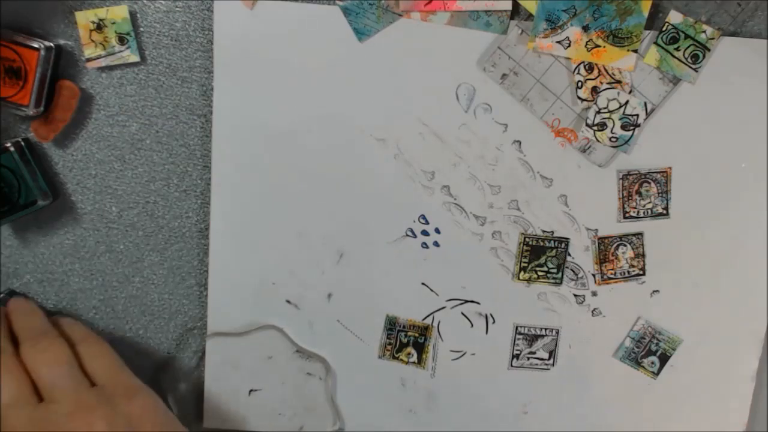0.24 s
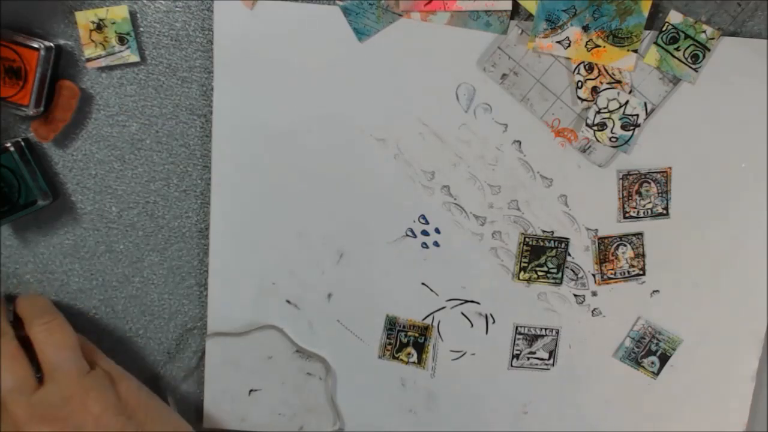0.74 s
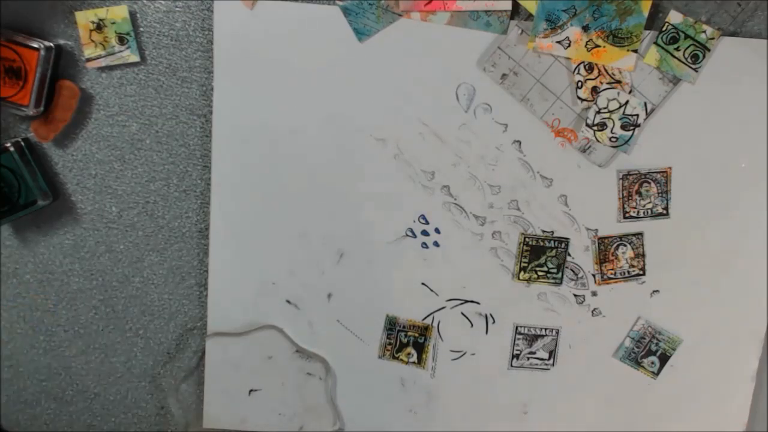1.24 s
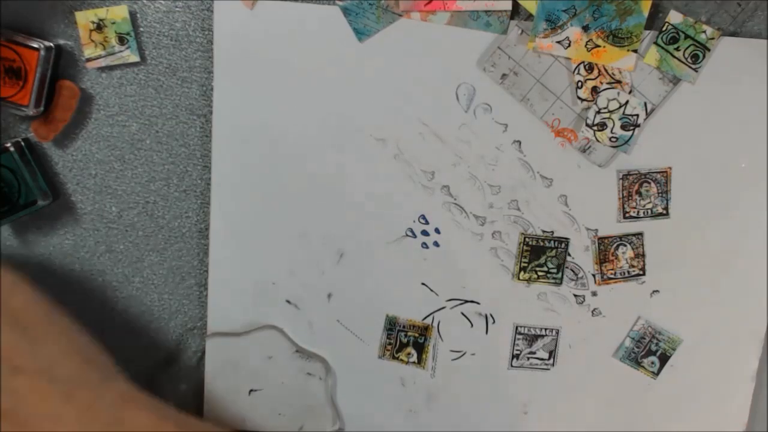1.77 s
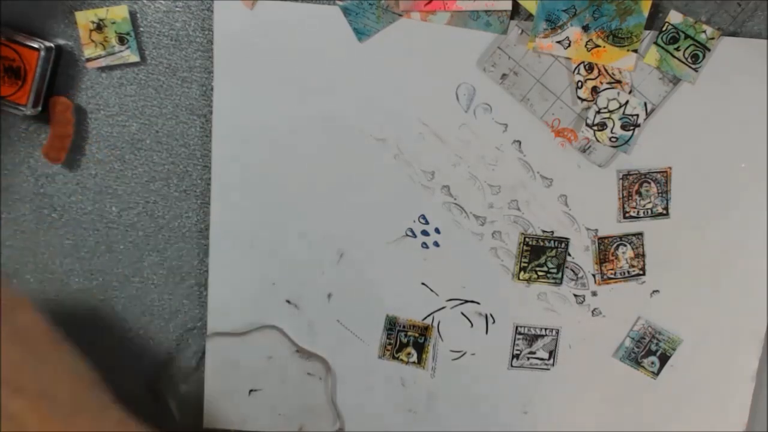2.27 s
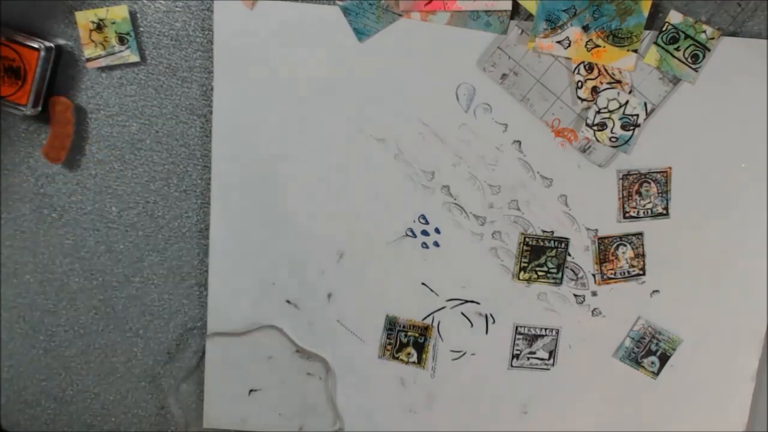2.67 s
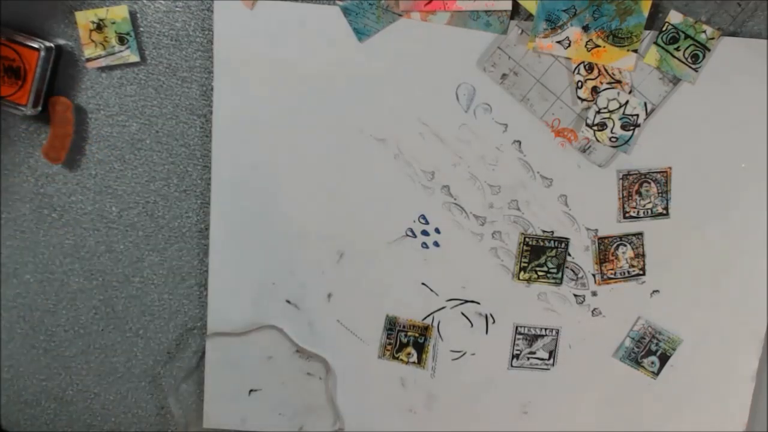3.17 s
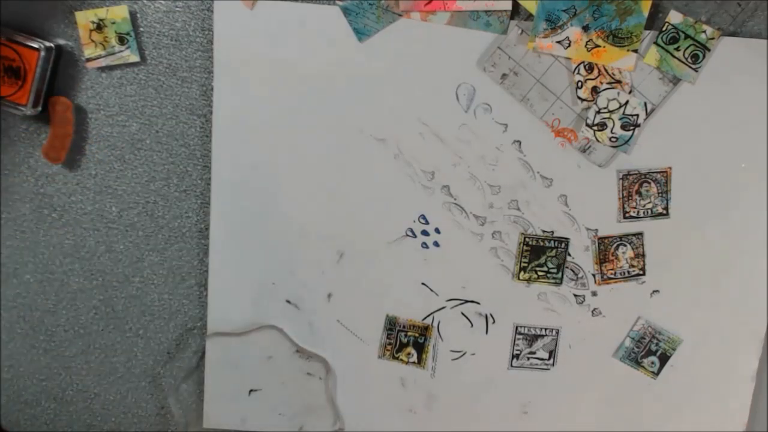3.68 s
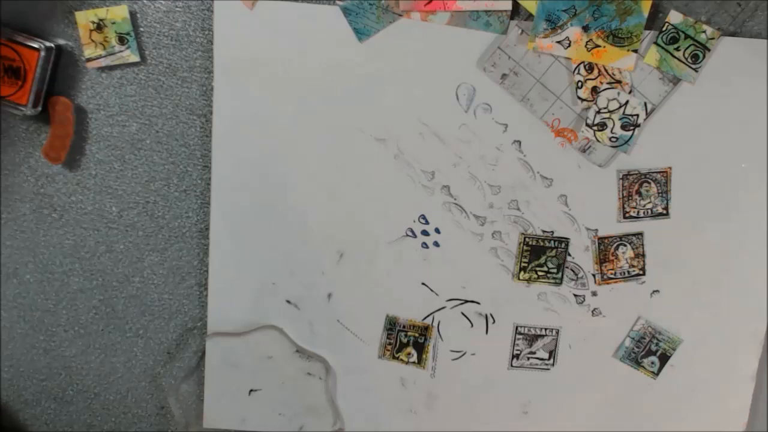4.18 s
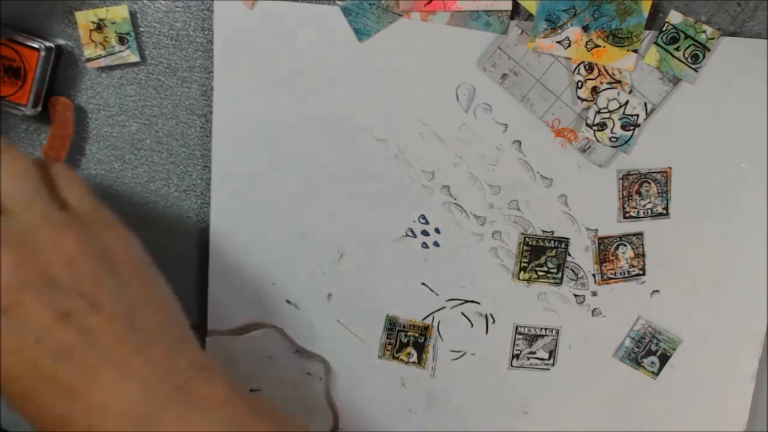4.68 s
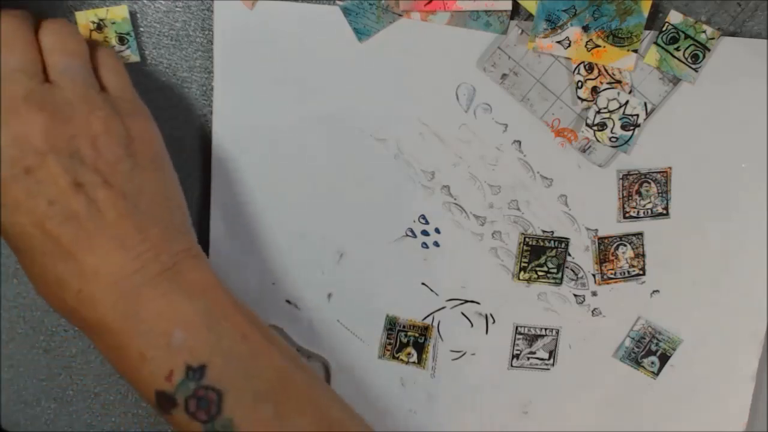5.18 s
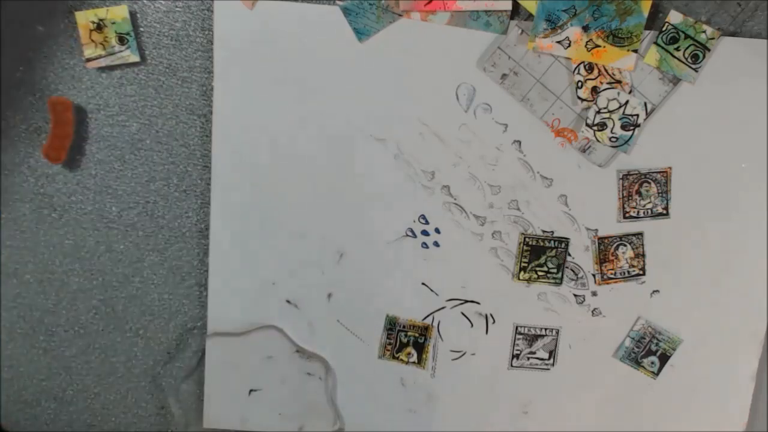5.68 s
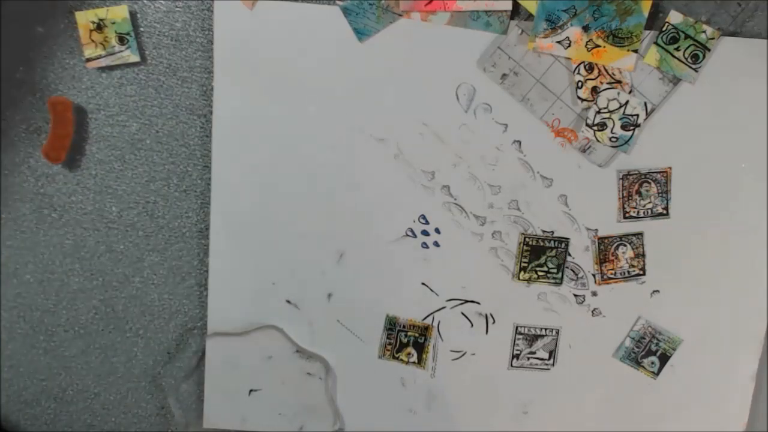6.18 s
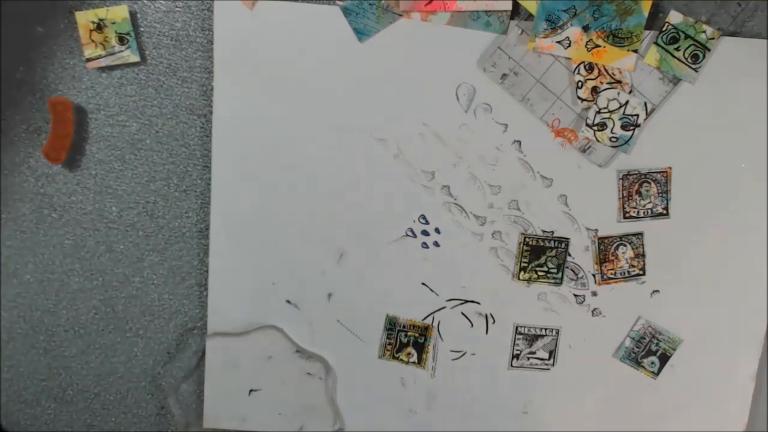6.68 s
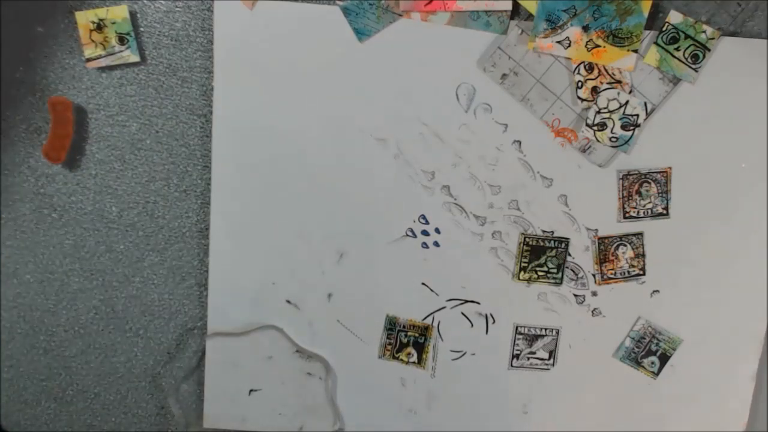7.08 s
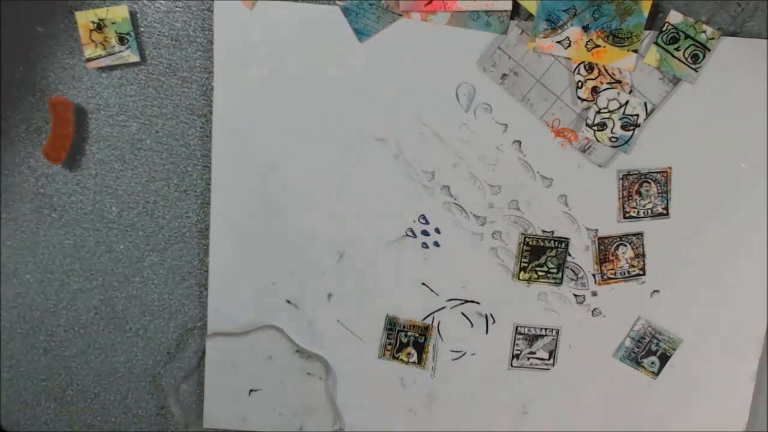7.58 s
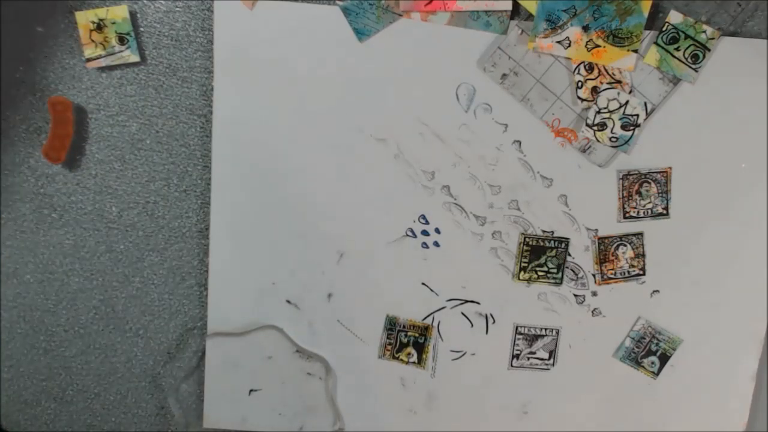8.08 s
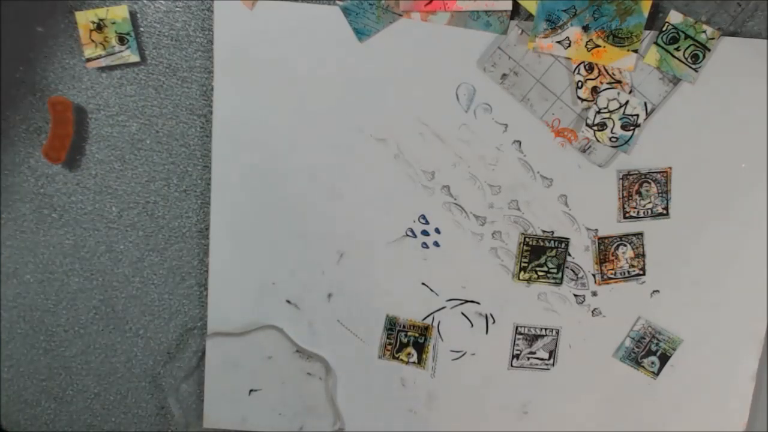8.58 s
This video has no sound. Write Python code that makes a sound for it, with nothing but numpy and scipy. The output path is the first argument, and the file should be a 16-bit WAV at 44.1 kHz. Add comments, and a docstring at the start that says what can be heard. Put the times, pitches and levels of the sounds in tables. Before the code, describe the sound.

Irregular plastic clatter and dull table knocks, with crisp scuffing ticks and a low rumble, in a quiet small room.

```python
"""Small plastic ink pads are gathered from a craft table and stacked away, close to the microphone.
Each contact is a short burst of force that rings modes of the table and the hollow cases, shared out by
weight, hardness and the spot struck; scuffs of plastic on plastic are scattered tiny ticks over a rub.
The table rumbles softly in low swaying resonances as it is leaned on, and fingers brush it faintly.
Behind lie background noise, coloured and patchy in level, and the hum of a fan, as narrow bands of noise."""
import sys
import numpy as np
from scipy import signal
from scipy.fft import rfft, irfft
from scipy.io import wavfile
from scipy.ndimage import uniform_filter1d

SR = 44100
rng = np.random.default_rng(int(sys.argv[2]) if len(sys.argv) > 2 else 0)


def dump(signal):
    """Clip the signal to [-1, 1] and save it as 16-bit WAV at the path in sys.argv[1]."""
    limited = np.clip(np.atleast_2d(signal).T, -1, 1)
    pcm = np.round(limited * 32767).astype(np.int16)
    wavfile.write(sys.argv[1], SR, pcm)


N = 389844

# The five parts that ring: thud, knock, case, lid, tick. Each row: lowest in Hz, highest in Hz,
# dull crack against the ring in dB, room against the direct sound in dB, room t60 in s, pitch spread as a share.
PARTS = [(28.2, 210, -12.5, 0.5, .35, 0.0057), (205, 620, 2, -2.5, 0.25, 0.0038),
         (655, 1706, 10, 1, 0.23, 0.014), (1598, 5100, 8, 2, 0.24, 0.04), (4630, 18000, 4, -6, 0.2, 0.034)]
# The table's lowest resonances, which leaning sets swaying. Each row: pitch in Hz, level in dB.
SWAY_MODES = [(80, -1), (156, -10.5)]


def amp(db):
    """Decibels to gain."""
    return 10 ** (np.asarray(db) / 20)


def unit_rms(x):
    """Scales to a mean power of 1."""
    return x / np.sqrt(np.mean(x ** 2) + 1e-20)


def unit_energy(x):
    """Scales to a total energy of 1."""
    return x / (np.linalg.norm(x) + 1e-20)


def add(mix, s, sound):
    """Mixes a sound in at time s."""
    part = mix[max(round(s * SR), 0):][:len(sound)]
    part += sound[:len(part)]


def coloured(x, points):
    """Filters x by a curve of (Hz, dB) points, at rms 1."""
    hz, db = np.transpose(points)
    f = np.fft.rfftfreq(len(x), 1 / SR)
    gain = amp(np.interp(np.log(f + 1), np.log(hz), db))
    return unit_rms(irfft(rfft(x) * gain, len(x)))


def band(x, lo_hz, hi_hz, order=4):
    """Causal band-pass."""
    edges = [lo_hz, min(hi_hz, SR / 2 - 1000)]
    return signal.sosfilt(signal.butter(order, edges, "band", fs=SR, output="sos"), x)


def drift(per_s):
    """Random wandering of rms 1, with per_s turning points each second."""
    knots = rng.standard_normal(400)
    return unit_rms(np.interp(np.arange(N) / SR * per_s, np.arange(400), knots))


def emphasise(x, hz, width_hz, broad):
    """One wide resonance on top of a share of the plain sound."""
    b, a = signal.iirpeak(min(hz, SR / 3), hz / width_hz, fs=SR)
    return signal.lfilter(b, a, x) + broad * x


def ring(t, lo_hz, hi_hz, crack_db, spread, spot_db=0.5):
    """Decaying modes of one part, their strengths and pitches varied at each call, plus a dull crack."""
    # Modes of the table (under 700 Hz) and of the plastic cases.
    # Each row: pitch in Hz, level in dB before the weighting by decay, t60 in s.
    modes_of_parts = [(38.43, -13, 0.25), (107.6, 0.5, 0.11), (168, 2.5, 0.096), (215.2, -1, 0.037),
                      (298.4, -6, 0.1), (328.3, -1.5, 0.12), (477, -6, 0.092), (533, 1, 0.08),
                      (875, -9.5, 0.022), (931, -2.5, 0.075), (1088, -5, 0.1), (1260, -13, 0.024),
                      (1561, -6.5, 0.072), (2024, 3, 0.022), (2278, 0.5, 0.044), (2590, -4.5, .04),
                      (3100, -1, 0.025), (3610, 3, 0.02), (4700, 6, 0.02), (5410, 2.5, .015),
                      (5784, 2, 0.02), (7430, -8.5, 0.029), (7400, 0.5, 0.014), (8440, 4, 0.0031),
                      (9700, -0.5, 0.0042)]
    hz, db, t60 = np.transpose(modes_of_parts)
    strength, offset, side = rng.standard_normal((3, len(hz)))
    # short modes start louder
    size = np.sign(side) * amp(db + spot_db * strength) / np.sqrt(t60)
    pitch = hz * (1 + spread * offset)
    modes = np.zeros(len(t))
    for k in np.flatnonzero((hz >= lo_hz) & (hz < hi_hz)):
        decay = np.exp(-np.log(1000) * t / t60[k])
        modes += size[k] * decay * np.sin(2 * np.pi * pitch[k] * t)
    crack = band(signal.unit_impulse(len(t)), lo_hz, hi_hz)
    return unit_energy(band(modes, lo_hz, hi_hz, order=2)) + amp(crack_db) * unit_energy(crack)


def room(t, room_db, t60, first_s=.003, near_s=0.0045, near_db=-3):
    """Direct sound, quick echoes off the table and its clutter, then the tail of a small room."""
    sparse = rng.standard_normal((2, len(t))) * (rng.random((2, len(t))) < 1 / 8)
    taps = sparse * (t > first_s)
    tail = unit_energy(taps[0] * np.exp(-np.log(1000) * t / t60))
    near = unit_energy(taps[1] * np.exp(-t / near_s))
    response = amp(room_db) * (tail + amp(near_db) * near)
    response[0] += 1
    return response


def background(noise_db=-57.5, swell_db=0.2, level_patch_db=3.0, flutter_db=4.5):
    """Background noise with random level patches across time and pitch, and the fuzzy, fluttering hum of a fan."""
    # The tone of the room air. Each row: frequency in Hz, level in dB per Hz before noise_db sets the loudness.
    air_colour = [(15, -9), (32, -0.5), (85, -6), (155, 4.5), (220, -15.5), (480, -7.5), (570, -2.5),
                  (690, -9.5), (1000, -13), (1500, -17.5), (3300, -27.5), (9000, -28), (15500, -38.5)]
    # The fan's resonances. Each row: centre in Hz, rms level in dB before the flutter, width in Hz.
    hum = [(558.5, -69.5, 54), (946, -75, 9.7), (1108, -74.5, 14)]
    cells = signal.stft(coloured(rng.standard_normal(N), air_colour), nperseg=1024)[2]
    level_patches = uniform_filter1d(rng.standard_normal(cells.shape), size=14, axis=0)
    level_patches = unit_rms(uniform_filter1d(level_patches, size=12, axis=1))
    noise = signal.istft(cells * amp(level_patch_db * level_patches), nperseg=1024)[1][:N]
    out = amp(noise_db + swell_db * drift(7.5)) * noise
    for hz, db, width_hz in hum:
        line = band(rng.standard_normal(N), hz - width_hz / 2, hz + width_hz / 2, order=2)
        out += amp(db + flutter_db * drift(7.9)) * unit_rms(line)
    return out


def tremble(level_db=-59, uneven_db=5.5, turns_per_s=6.5, width_hz=16):
    """Small random shifts of weight keep the table's lowest resonances stirring under the arm."""
    push = rng.standard_normal(N) * amp(uneven_db * drift(turns_per_s))
    motion = sum(amp(db) * emphasise(push, hz, width_hz, 0) for hz, db in SWAY_MODES)
    return amp(level_db) * unit_rms(band(motion, 45, 320, order=2))


def sway(length_s=0.3, spread=0.032, looseness=0.36):
    """Each heavier shift of weight makes the table's lowest resonances swell and fade over a low rumble."""
    # The heavier shifts of weight on the table. Each row: peak in seconds, level in dB before the fades.
    nudges = [(0.298, -51.5), (0.518, -48), (1.91, -47.5), (2.458, -47), (2.989, -44), (3.53, -42),
              (3.818, -47), (4.072, -42.5), (4.238, -47), (4.841, -46), (5.641, -45.5), (5.832, -45),
              (6.7, -42.5), (6.898, -45.5), (7.252, -51), (7.599, -52.5), (7.799, -51), (8.068, -45),
              (8.383, -45), (8.522, -44)]
    t, out = np.arange(round(length_s * SR)) / SR, np.zeros(N)
    for s, level_db in nudges:
        rumble = unit_rms(band(rng.standard_normal(16384), 45, 147, order=2))
        motion = looseness * rumble[:len(t)]
        for hz, db in SWAY_MODES:
            pitch = hz * (1 + spread * rng.standard_normal())
            motion = motion + amp(db) * np.sin(2 * np.pi * (pitch * t + rng.random()))
        add(out, s - length_s / 2, amp(level_db) * unit_rms(motion) * np.hanning(len(t)))
    return out


def brushing(level_db=-71, uneven_db=5, turns_per_s=14, lo_hz=260, hi_hz=2800):
    """Fingers brush the table and the cases: faint uneven noise rings their modes."""
    rub = rng.standard_normal(N) * amp(uneven_db * drift(turns_per_s))
    body = ring(np.arange(8192) / SR, lo_hz, hi_hz, crack_db=2, spread=0.0047)
    return amp(level_db) * unit_rms(signal.oaconvolve(rub, body)[:N])


def slides(catches_per_s=320, size_db=5, uneven_db=1.5, hiss=0.96, scrape_db=-20,
           catch_s=0.00074, room_db=-3, catch_hz=7800, spread=0.17):
    """Sliding plastic catches and lets go: scattered tiny ticks, each at its own pitch, over a fine rub."""
    # Plastic scuffing on plastic, each a swell and a release.
    # Each row: peak in seconds, length in seconds, pressure in dB.
    scuff_swells = [(0.026, 0.16, -52), (0.164, 0.11, -54.5), (0.281, 0.14, -50), (0.374, 0.024, -40),
                    (0.408, 0.045, -46), (0.496, .04, -34), (0.554, 0.064, -42), (0.632, 0.066, -48),
                    (0.718, 0.087, -46), (2.83, 0.19, -64.5), (3.01, .18, -68), (4.975, 0.13, -69),
                    (5.745, 0.021, -49), (5.91, 0.051, -36.5), (6.873, 0.16, -59.5), (6.968, 0.052, -60),
                    (8.021, 0.043, -66), (8.292, 0.093, -44.5), (8.413, 0.057, -40), (8.46, .04, -47),
                    (8.579, 0.068, -45.5), (8.788, 0.06, -56)]
    # The tone of the rub. Each row: frequency in Hz, level in dB per Hz before the pressure sets the loudness.
    slide_colour = [(500, -1), (1500, -13.5), (4000, -11), (6500, -5), (8200, -3.5), (10000, -3),
                    (16000, -11.5)]
    ticks, t, now = np.zeros(N), np.arange(8192) / SR, np.arange(N) / SR
    pressure = np.zeros(N)
    for s, length_s, level_db in scuff_swells:
        pressure += amp(level_db) * np.exp(-2 * (2 * (now - s) / length_s) ** 2)

    chance, size, pitch = rng.random(N), rng.exponential(1, N), rng.standard_normal(N)
    age = t[:160] / catch_s
    for at in np.flatnonzero(chance < catches_per_s / SR):
        hz = catch_hz * np.exp(spread * pitch[at])
        tick = age * np.exp(-age) * np.sin(2 * np.pi * hz * t[:160])
        add(ticks, at / SR, amp(size_db * min(size[at], 3)) * tick)

    rub = (unit_rms(ticks) + hiss * rng.standard_normal(N)) * amp(uneven_db * drift(40))
    lid_ring = ring(t, 2000, 3500, crack_db=-6.0, spread=0.022)
    lid = unit_rms(signal.oaconvolve(rub, lid_ring)[:N])  # the rub also rings the lid
    scuffs = pressure * (coloured(rub, slide_colour) + amp(scrape_db) * lid)
    tick_t60 = PARTS[-1][4]
    return signal.oaconvolve(scuffs, unit_energy(room(t, room_db, tick_t60)))[:N]


def force(chatter_s, first_touch=2.0, soft_s=0.002, glancing_s=0.0054, evenness=0.38):
    """A first touch, then a chatter of tiny slips; a long, glancing chatter swells with little first touch."""
    t = np.arange(4096) / SR
    age = 2 * t / max(chatter_s, 1 / SR)
    swell = age ** min(1 + chatter_s / glancing_s, 2) * np.exp(-age)
    slips = unit_energy(rng.standard_normal(len(t)) * rng.exponential(1, len(t)) * swell)
    slips[0] += first_touch * np.exp(-chatter_s / soft_s)
    spectrum = rfft(np.roll(slips, 16))  # a few samples of lead-in for what the flattening spreads ahead
    # the force has little pitch of its own: most colour comes from what it strikes
    flattened = spectrum / (abs(spectrum) + 1e-6) ** min(evenness, 1)
    return irfft(flattened)[:len(t) // 2]


def soften(x, hardness_db, corner_hz=3400, follow=0.52):
    """A soft touch, with little tick, reaches only the lower modes of the lid."""
    hz = np.clip(corner_hz * amp(follow * hardness_db), 1500, SR / 4)
    return signal.sosfilt(signal.butter(4, hz, fs=SR, output="sos"), x)


def contacts():
    """One force drives table and case at each contact; weight, hardness and spot share it out."""
    # A case meets the table or another case. Weight goes into the table and hardness into the sharp edge tick.
    # Each row: start in seconds, strength in dB, weight in dB against the strength, hardness in dB against
    # the strength, spot struck (0 = hollow base, 1 = lid), chatter time in seconds, pitch of the hollow ring
    # in Hz, pitch of the edge tick in Hz.
    touches = [(0.199, -71.5, -15, 32, 0.44, 0.0003, 940, 8250),
               (0.22, -71, -1, 30, 0.62, 0.0018, 1030, 9450),
               (0.3822, -62.5, -5, 26.5, 0.5, 0.0032, 1350, 8900),
               (0.4405, -68.5, -0.5, 28, 0.47, 0.00067, 930, 7400),
               (0.463, -59, -2, 20.5, 0.44, 0.00054, 990, 8450),
               (0.501, -50.5, 6, 17, 0.59, 0.0018, 970, 8200),
               (0.5223, -47, -10, 21, 0.58, 0.0017, 1130, 8200),
               (0.585, -59, -11, 13.5, 0.64, 0.0019, 1490, 8500),
               (0.7524, -59.5, -25, 22.5, 0.37, 0.0013, 940, 7150),
               (0.819, -45.5, -21, -6.5, 0.61, 0.003, 1260, 5500),
               (0.834, -40, -24, -2.5, 0.72, 0.0021, 1260, 5500),
               (0.909, -33.5, -2, -11.5, 0.6, 0.0025, 850, 6950),
               (0.9446, -37, -0.5, -10.5, 0.24, 0.0043, 1100, 6950),
               (0.95, -37, -23, -6.5, 0.31, 0.0014, 1100, 6950),
               (0.9926, -48, -1.5, 7, 0.092, 0.0035, 1110, 9250),
               (1.536, -42.5, 3.5, -4, 0.47, 0.0021, 960, 8700),
               (1.5551, -41.5, 0.5, 14.5, 0.7, 0.0023, 930, 7200),
               (1.5685, -47.5, 7, 15.5, 0.61, 0.0013, 920, 7300),
               (1.595, -38, -5, 13.5, 0.43, 0.0011, 1140, 7350),
               (1.701, -47, 7.5, -19, 0.05, 0.0013, 920, 8300),
               (1.7985, -50.5, 8.5, -21, 0.63, 0.0015, 750, 8300),
               (1.823, -62.5, 13, -22, 0.23, 0.0035, 720, 8300),
               (2.144, -60, -8, 8, 0.65, 0.0015, 920, 7550),
               (2.182, -48, -11, -16, 0.5, 0.0024, 1230, 7300),
               (2.201, -37, -29, -10, 0.68, 0.0031, 1210, 7300),
               (2.979, -62.5, 14.5, -12, 0.5, 0.013, 720, 8300),
               (3.078, -33, 1, -16.5, 0.11, 0.0016, 930, 8300),
               (3.357, -54, -20, -22, 0.88, 0.0017, 930, 8300),
               (3.3996, -52, 5, -0.5, 0.75, 0.0012, 960, 8500),
               (3.946, -61, 19, -9, 0.35, 0.0022, 720, 8300), (3.979, -66, 5, -1, 0.92, 0.002, 1080, 8300),
               (4.206, -54, -1, 3.5, 0.5, 0.0033, 1100, 8650),
               (4.367, -62.5, 15, -32, 0.25, 0.0023, 720, 8300),
               (4.406, -68.5, -11, 21.5, 0.42, 0.0061, 1080, 7550),
               (5.3509, -48, -11, 5, 0.72, 0.0046, 1490, 6100),
               (5.7873, -40.5, -10, 3, 0.53, 0.002, 1250, 7650),
               (5.897, -48.5, 1, 20, 0.53, 0.001, 930, 7350),
               (5.964, -44.5, -7.5, 10, 0.51, 0.0042, 1250, 8900),
               (5.982, -42, 1.5, 13, 0.64, 0.0013, 1250, 9000),
               (6.008, -36.5, -1.5, 7, 0.65, 0.0011, 1250, 9100),
               (6.0397, -46, -3, 14.5, 0.49, 0.0018, 1120, 5650),
               (6.1112, -69, -10, 26, 0.33, 0.0013, 1080, 6950),
               (6.167, -28.5, -3.5, 4, 0.55, 0.0017, 940, 9150),
               (6.2205, -27.5, 5, 3.5, 0.51, 0.0016, 1080, 7850),
               (6.2248, -34, 6, -1.5, 0.63, 0.003, 1080, 5750),
               (6.298, -49, -8, 5, 0.36, 0.0039, 1080, 8200),
               (6.3475, -33, 1, -12, 0.33, 0.002, 1040, 7600),
               (6.699, -49.5, -12, 3.5, 0.45, 0.011, 930, 8300),
               (6.7441, -40, -6, -4, 0.4, 0.0046, 740, 8650), (7.055, -58, -3, -5, 0.35, 0.012, 750, 8850),
               (7.346, -70, -11, 0.5, 0.77, 0.0066, 1160, 8350),
               (7.415, -51, -25, -3.5, 0.64, 0.0066, 1060, 8500),
               (8.1686, -59, -12, 10.5, 0.49, 0.0019, 930, 7950),
               (8.189, -51, 0.5, -4, 0.2, 0.0039, 1070, 8300),
               (8.234, -50.5, -2.5, -11, 0.15, 0.0044, 1060, 7800),
               (8.28, -50, -18, 2.5, 0.58, 0.012, 1040, 8650),
               (8.4259, -41.5, -5.5, 0.5, 0.63, 0.0055, 1190, 7350),
               (8.502, -58.5, 2.5, 9.5, 0.45, 0.0013, 1080, 8550),
               (8.586, -45, -10.5, 5, 0.55, 0.0038, 1080, 7750),
               (8.659, -53.5, -12.5, 7.5, 0.4, 0.001, 1350, 8900),
               (8.77, -47, 3, -14, 0.05, 0.0048, 970, 7600)]
    thud_base_db, thud_per_hardness = -3.5, .2  # deep thud against the knock; growth in dB per dB
    heavy_db, thud_per_excess = -33, 0.67  # a knock above this level sets the whole table booming, dB per dB
    # lid against the hollow case; growth with hardness in dB per dB, and from base to lid in dB
    lid_base_db, lid_per_hardness, lid_spot_db = -4.5, 0.44, 36
    knock_hz, lid_hz = 321, 2100  # main resonances of the table's knock and of the lid
    faint_db = -50  # reference for how strength fills out the tone
    case_filling = 0.86  # stronger blows wake table, case and lid beyond their main resonances, dB per dB
    narrow_tick_hz, tick_widening = 1330, .35  # narrowest edge resonance in Hz; widening in dB per dB

    out, t = np.zeros(N), np.arange(12288) / SR
    for s, strength_db, weight_db, hardness_db, spot, chatter_s, case_hz, tick_hz in touches:
        push = force(chatter_s)
        boom_db = thud_per_excess * max(strength_db + weight_db - heavy_db, 0)
        thud_db = weight_db + thud_base_db + thud_per_hardness * hardness_db + boom_db
        lid_db = lid_base_db + lid_per_hardness * hardness_db + lid_spot_db * (spot - .5)

        thud, knock, case, lid, tick = (
            signal.fftconvolve(ring(t[:8192], lo_hz, hi_hz, crack_db, spread), push)
            for lo_hz, hi_hz, crack_db, _, _, spread in PARTS)

        # light touches ring purer than hard blows
        widening = np.clip(amp(tick_widening * (strength_db + hardness_db - faint_db)), 1, 4)
        fullness = amp(case_filling * max(strength_db - faint_db, 0))
        knock = emphasise(knock, knock_hz, width_hz=92, broad=0.44 * fullness)
        case = emphasise(case, case_hz, width_hz=140, broad=0.15 * fullness)
        lid = emphasise(lid, lid_hz, width_hz=390, broad=0.77 * widening * fullness)
        lid = soften(lid, hardness_db - lid_db)
        tick = emphasise(tick, tick_hz, width_hz=narrow_tick_hz * widening, broad=0.11)

        sounds = thud, knock, case, lid, tick
        shares_db = thud_db, weight_db, 0, lid_db, hardness_db
        for sound, share_db, (*_, room_db, t60, _) in zip(sounds, shares_db, PARTS):
            heard = signal.fftconvolve(sound, room(t, room_db, t60))[:len(t)]
            attack = np.sqrt(np.mean(heard[:1024] ** 2))  # levels hold over the first 23 ms
            add(out, s, amp(strength_db + share_db) * heard / attack)
    return out


def scene():
    """Everything at one microphone."""
    return (background() + tremble() + sway() + brushing() + slides() + contacts())[None]


def record(dry):
    """A small microphone that dulls above 9 kHz, then the recorder's band limit."""
    # The microphone's treble roll-off. Each row: frequency in Hz, gain in dB.
    microphone = [(9300, 1), (11700, -12.5), (14500, -8.5), (16500, -25)]
    edge_hz = 16400
    f = np.fft.rfftfreq(N, 1 / SR)
    gain = amp(np.interp(f, *np.transpose(microphone)))
    heard = irfft(rfft(dry) * gain, N)
    low_pass = signal.firwin(255, edge_hz, window=("kaiser", 9), fs=SR)
    return signal.oaconvolve(heard, low_pass[None], "same")


dry = scene()
out = record(dry)
dump(out)
```